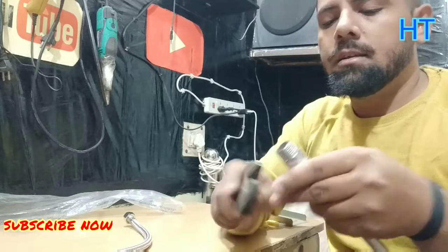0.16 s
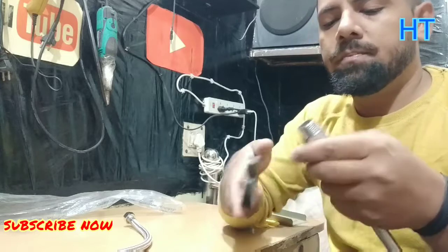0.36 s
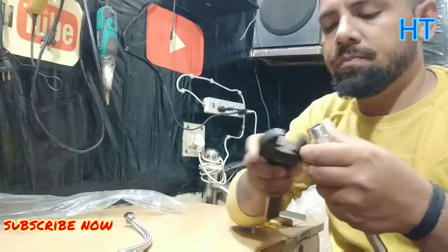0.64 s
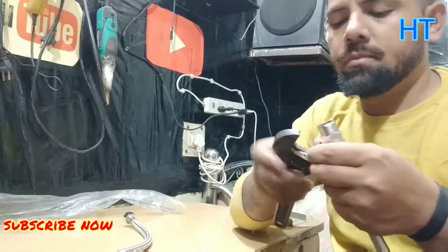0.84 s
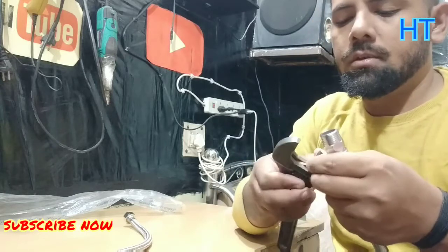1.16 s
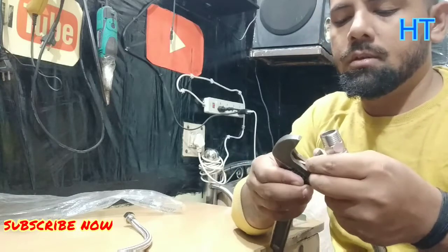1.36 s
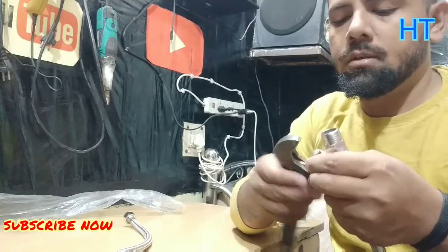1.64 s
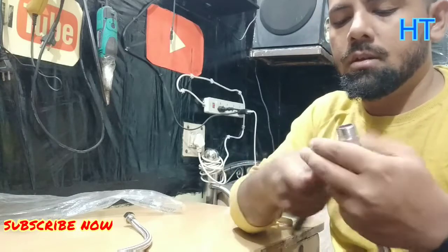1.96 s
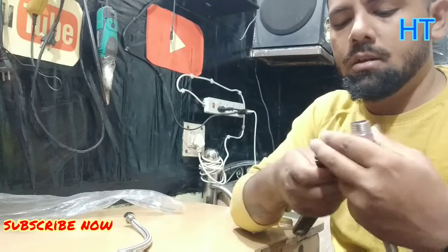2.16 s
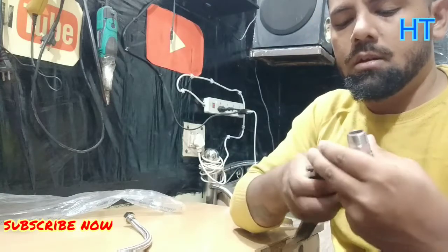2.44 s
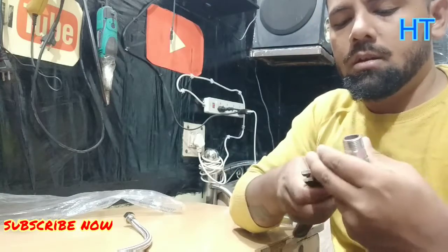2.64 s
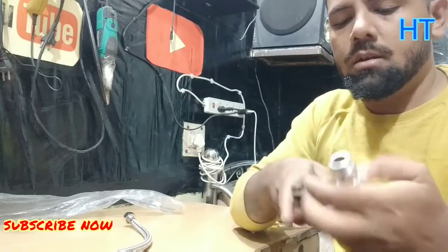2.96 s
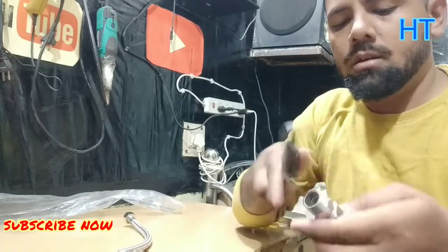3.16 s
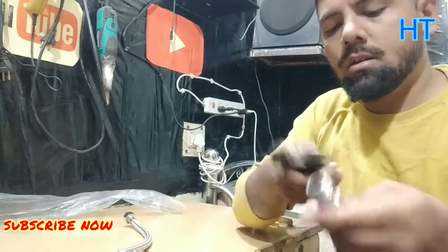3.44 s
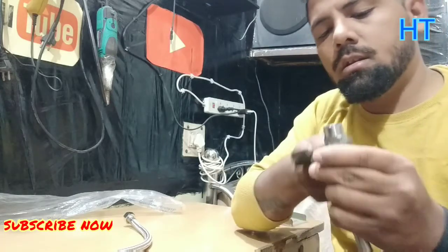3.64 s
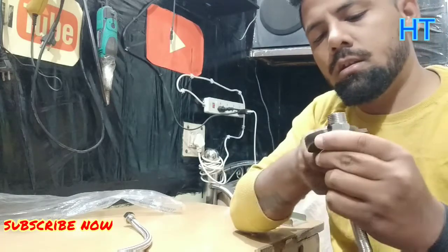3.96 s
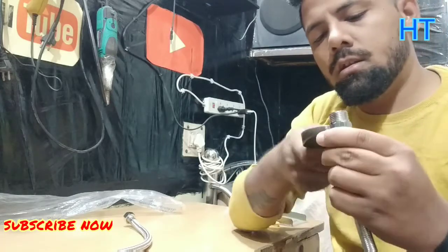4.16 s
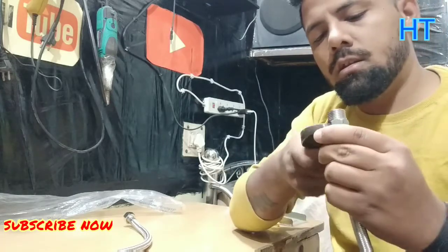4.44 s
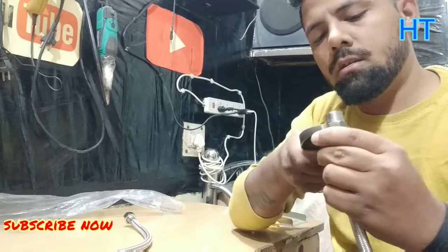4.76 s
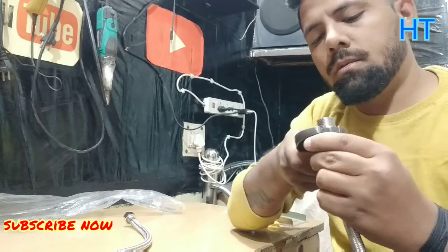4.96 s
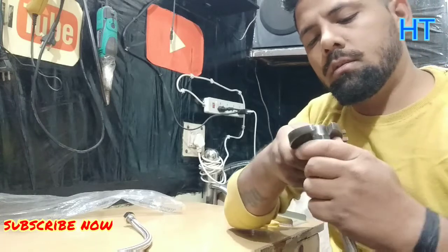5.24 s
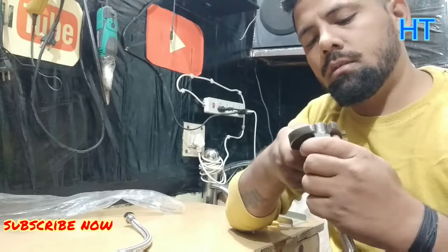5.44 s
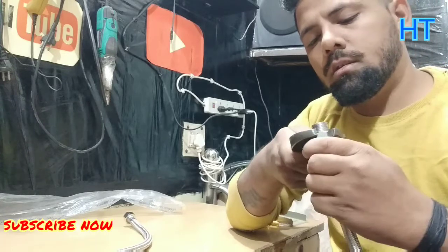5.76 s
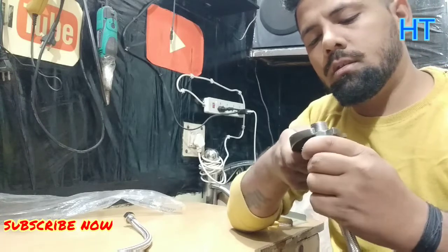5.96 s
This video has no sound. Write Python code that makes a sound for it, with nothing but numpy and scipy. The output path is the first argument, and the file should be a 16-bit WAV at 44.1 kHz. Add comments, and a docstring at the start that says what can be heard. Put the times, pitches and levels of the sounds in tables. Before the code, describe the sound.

A steel wrench is fitted to a hand-held metal pipe connector at a workbench. A few light, ringing clinks come first, then small clicks and scrapes as the jaws settle. Midway the jaws catch with a loud metallic crack, slip with soft crunches and rubbing, and crack again near the end. The handling sounds close in a small, live room, over faint rumble, hiss and a wavering low hum.

```python
"""Wrench on a pipe connector.

A steel wrench is fitted to a hand-held metal connector at a workbench in a small, live room.
Loose knocks rebound and leave the wrench ringing; held against the fitting, its jaws click, skid
and twice bite hard. Tiny catches of the rough steel drive the modes of both parts.
Under it lie room rumble, faint hiss and a wavering low hum."""
import sys
import numpy as np
from scipy import signal
from scipy.fft import rfft, irfft, next_fast_len
from scipy.io import wavfile

SR = 44100
rng = np.random.default_rng(int(sys.argv[2]) if len(sys.argv) > 2 else 0)


def master_out(mix):
    """Clip the mix to full scale and print it as 16-bit PCM to the path in sys.argv[1]."""
    frames = np.transpose(np.atleast_2d(mix))
    ceiling = np.clip(frames, -1, 1)
    pcm = np.round(ceiling * 32767).astype(np.int16)
    wavfile.write(sys.argv[1], SR, pcm)


N = 268657

# loose knocks: (time [s], level [dB], skid [s], edge [dB], pan L-R [dB], spot [Hz], second spot [Hz],
# rebound delay [s], rebound level [dB], rebound spot [Hz])
KNOCKS = [(0.7993, -31, 0.0035, 0.5, 1.5, 7440, 8780, 0.0069, -38.5, 7500),
          (1.039, -24, 0.0044, 5, 3, 6200, 2278, .018, -31, 4560),
          (1.169, -31.5, 0.0058, 1, 3, 3080, 10970, 0.013, -28, 6866),
          (3.092, -28, 0.0038, -4.5, -7, 7210, 3400, 0.088, -44.5, 2900),
          (3.678, -28, 0.0056, 7.5, -3.5, 4850, 5330, 0.02, -37, 4690),
          (3.9036, -28, 0.0046, -0.5, -13, 7060, 3000, 0.023, -44.5, 6850)]
def clinks():
    """A half-choked knock, then a rebound that leaves the wrench ringing freely; stereo."""
    out = np.zeros((2, N))
    for s, db, skid_s, edge_db, pan_db, spot_hz, second_hz, delay_s, rebound_db, rebound_hz in KNOCKS:
        pan = from_db([[pan_db / 2], [-pan_db / 2]])
        t60_s = 3.3 * skid_s   # a looser, longer graze rings longer
        knock = contact(db, skid_s, t60_s, catch=0.58, grip_db=-17, snap_db=0, body_db=3.5,
                        edge_db=edge_db, spot_hz=[spot_hz, second_hz], lift_db=10)
        rebound = contact(rebound_db, skid_s=0.0095, t60_s=0.023, catch=0.67, grip_db=-11.5,
                          snap_db=-1.5, body_db=6.5, edge_db=edge_db, spot_hz=rebound_hz, lift_db=16.5)
        add(out, s, pan * knock)
        add(out, s + delay_s, pan * rebound)
    return out


# hard catches: (time [s], level [dB], skid [s], snap [dB], body [dB], edge [dB], spot [Hz], lift [dB],
# room send [dB])
JAW_BITES = [(3.6253, -18, 0.004, 12, 2.5, 17, 5400, 17.5, -3.5),
             (3.628, -14.5, 0.0066, 1, 0.5, -0.5, 9250, 13.5, -5),
             (5.6835, -37, 0.007, 15, -1, -29, 4160, 7, 9.5),
             (5.695, -28.5, 0.0061, -0.5, -1.5, -9, 2770, 20, 4.5),
             (5.699, -20.5, 0.00033, 34, -10.5, -7, 4050, 14, -3),
             (5.7027, -28, 0.0063, 7.5, -7, -2, 8800, 21, 3.5)]
def bites():
    """The jaws catch hard in quick runs of loud metallic cracks; returns direct sound and room send."""
    out = np.zeros((2, N))
    for s, db, skid_s, snap_db, body_db, edge_db, spot_hz, lift_db, send_db in JAW_BITES:
        bite = contact(db, skid_s, t60_s=0.012, catch=0.51, grip_db=-3, snap_db=snap_db,
                       body_db=body_db, edge_db=edge_db, spot_hz=spot_hz, lift_db=lift_db)
        add(out, s, bite * from_db([[0], [send_db]]))
    return out


# jaws seating: (time [s], level [dB], skid [s], edge [dB], spot [Hz], lift [dB])
JAW_CLICKS = [(0.0188, -30.5, 0.0023, 0.5, 4800, 8), (1.398, -44, 0.01, 3, 4000, 15),
              (2.166, -49, 0.0028, 15, 6220, 26.5), (2.3275, -35.5, 0.0018, -6, 4730, 17),
              (2.3673, -31, 0.0036, 9, 9230, 11), (2.3744, -32, 0.0025, -20, 4780, 14),
              (2.61, -42, 0.017, -1, 6080, 17), (2.78, -45, 0.0021, 2, 4800, 12),
              (2.819, -38.5, 0.0022, 3, 6560, 8), (2.931, -42.5, 0.011, 6, 5200, -15),
              (3.655, -33, 0.004, -1, 9560, 14.5), (3.845, -45, 0.0066, 2, 4530, 25),
              (4.2238, -42.5, 0.008, -9, 9250, 25.5), (4.3645, -53.5, 0.001, 0, 4680, 24),
              (5.3365, -40, 0.004, 6, 9250, 11)]
def clicks():
    """The jaws click into place against the fitting."""
    out = np.zeros(N)
    for s, db, skid_s, edge_db, spot_hz, lift_db in JAW_CLICKS:
        body_db = 0.93 * (-41.5 - db)   # harder clicks have less body
        click = contact(db, skid_s, t60_s=0.017, catch=0.42, grip_db=2.5, snap_db=22,
                        body_db=body_db, edge_db=edge_db, spot_hz=spot_hz, lift_db=lift_db)
        add(out, s, click)
    return out


# jaws slipping: (time [s], level [dB], skid [s], edge [dB], spot [Hz], lift [dB])
JAW_SKIDS = [(2.187, -46.5, 0.028, 3, 3100, 27), (2.656, -45, 0.014, -15, 3080, 10),
             (2.723, -52, 0.042, -1, 3020, 14), (4.3683, -33.5, 0.0091, -27.5, 2000, 16.5),
             (4.377, -39.5, 0.0065, -17, 4530, 3), (4.396, -37.5, 0.0088, -9, 1990, 14),
             (5.064, -37, 0.0026, -23, 3150, 14.5), (5.069, -39, 0.0054, -3.5, 3130, 20),
             (5.1101, -41, 0.0058, -3, 5280, 14), (5.169, -44, 0.0045, 1, 6100, 15),
             (5.2392, -46.5, 0.0087, -2, 4630, 6), (5.267, -43.5, 0.0044, -8, 6100, 16),
             (5.275, -49.5, 0.0053, -8, 4530, 17), (5.555, -53, 0.018, -12.5, 3830, 9)]
def skids():
    """Longer, duller crunches as the jaws slip round the fitting."""
    out = np.zeros(N)
    for s, db, skid_s, edge_db, spot_hz, lift_db in JAW_SKIDS:
        crunch = contact(db, skid_s, t60_s=0.043, catch=0.72, grip_db=7, snap_db=22.5,
                         body_db=3, edge_db=edge_db, spot_hz=spot_hz, lift_db=lift_db)
        add(out, s, crunch)
    return out


# slides: (centre time [s], half length [s], level [dB], edge [dB])
SLIDES = [(0.729, 0.25, -61.5, 6), (1.837, 0.086, -60.5, 10), (2.803, 0.042, -49, 5),
          (3.053, 0.018, -47.5, 10), (3.623, 0.009, -29, 1), (4.887, 0.039, -51.5, 1),
          (4.363, 0.005, -40.5, -1.5), (5.219, 0.36, -53.5, -12), (5.657, 0.0069, -46.5, -14)]
def rubs():
    """Steel slides on steel or skin: catches swell and fade, driving damped modes."""
    out = np.zeros(N)
    t = np.arange(-SR // 6, SR // 6) / SR
    for s, half_s, db, edge_db in SLIDES:
        force = asperities(len(t), per_s=200, spread_db=2) * np.exp(-(t / half_s) ** 2)
        rub = steel(force, t60_s=0.046, grip_db=0, snap_db=13.5, body_db=-0.5, edge_db=edge_db)
        add(out, s + t[0], from_db(db) * np.sqrt(half_s * SR / 2) * rub)
    return out


def contact(db, skid_s, t60_s, catch, **timbre):
    """One sharp catch, then a short, dying skid, drives the steel."""
    t = np.arange(SR // 8) / SR
    force = unit_energy(asperities(len(t), per_s=3300, spread_db=11) * np.exp(-2 * t / skid_s))
    force[0] += catch
    gain = from_db(db) * np.sqrt(0.0096 * SR)   # level as if the energy fell within 9.6 ms
    return gain * steel(force, t60_s, **timbre)


def asperities(count, per_s, spread_db):
    """Tiny catches of rough surfaces, random in time and size."""
    hits = rng.random(count) < per_s / SR
    signs = rng.choice([-1, 1], count)
    return hits * signs * from_db(spread_db * rng.standard_normal(count))


# free wrench: (frequency [Hz], level [dB], t60 [x contact t60])
WRENCH_MODES = [(747, -15, 1), (1830, -10.5, .9), (2323, -12.5, 1), (3025, -19, 1.3), (3207, -8.5, 1.3),
                (3700, -26, .8), (4599, 1.5, .95), (4714, -7.5, .9), (5136, -4.5, 1.2), (6160, 3, 1.1),
                (7047, 7.5, 1.3), (7088, -10.5, 1), (7680, -1.5, .9), (8410, -1, 1), (9310, 0.5, 1),
                (9380, -6, .9), (9700, -0.5, 1), (10990, -3, 1.1), (11740, -8.5, .9), (12590, 0.5, 1),
                (12300, -15, 1)]
# fitting with the jaws pressed on it: (frequency [Hz], level [dB], t60 [x contact t60])
FITTING_MODES = [(1479, 1, .8), (1973, 3.5, 1), (2623, -14, .7), (2915, 1, 1.2), (3040, 0, 1.2),
                 (3663, -14, .6), (3958, -6.5, .8), (4127, -1.5, .7), (4396, 1, .8), (4664, -4.5, .7),
                 (4770, -6.5, .8), (5310, -5, .8), (6310, -5.5, .7), (7320, -2.5, .7), (7530, -0.5, .6),
                 (8590, 2, 1), (9200, 2, 1), (9610, -4, .8), (12610, -11.5, .6)]
def steel(force, t60_s, grip_db, snap_db, body_db, edge_db, spot_hz=0, lift_db=0):
    """The wrench rings; grip_db mixes in the fitting's ring, snap_db a sharp snap."""
    wrench = struck(force, WRENCH_MODES, t60_s, spot_hz, lift_db, detune=0.0015)
    fitting = struck(force, FITTING_MODES, t60_s, spot_hz, lift_db, detune=0.005)
    mix = wrench + from_db(grip_db) * fitting + from_db(snap_db) * pipe_snap(force)
    # the spot hit tilts the spectrum: body is the lower range, edge the top
    tilt = [(3200, body_db), (4400, 1.34), (7600, 3.1), (9000, edge_db), (12000, 0.21 * edge_db)]
    return unit_energy(colour(mix, tilt))


def struck(force, modes, t60_s, spot_hz, lift_db, detune, spot_width_hz=260, choked_db=-22):
    """Modes build up, sound choked while the metals touch, and ring on; the spot hit lifts near ones."""
    out = 0
    for (hz, db, t60_ratio), shift in zip(modes, rng.standard_normal(len(modes))):
        held_hz = hz * (1 + detune * shift)   # the hold shifts each mode
        buildup = ring(force, held_hz, t60_s=0.012)
        free = unit_energy(ring(buildup, held_hz, t60_s * t60_ratio))
        choked = unit_energy(ring(buildup, held_hz, t60_s=0.0075))
        nearness = np.max(np.exp(-((hz - np.asarray(spot_hz)) / spot_width_hz) ** 2))
        out = out + from_db(db + lift_db * nearness) * (free + from_db(choked_db) * choked)
    return out


def ring(force, hz, t60_s):
    """One decaying mode driven by a force."""
    radius = from_db(-60 / (t60_s * SR))
    angle = 2 * np.pi * hz / SR
    drive = force + 1e-18 * np.arange(len(force))   # avoids denormals
    return signal.lfilter([1, 0, -1], [1, -2 * radius * np.cos(angle), radius * radius], drive)


# bare snap of gripping jaws: (frequency [Hz], gain [dB])
SNAP_SPECTRUM = [(100, -15), (350, -7.5), (700, -8), (1100, 0.5), (1600, -6.5), (2300, 7), (3300, 5.5),
                 (4700, 0), (7500, -2.5), (9400, 0), (10300, -5), (12600, -24.5), (14000, -12.5)]
def pipe_snap(force, round_trip_hz=771, return_gain=0.42):
    """A snap runs back and forth along the pipe, leaving evenly spaced resonances."""
    snap = colour(force, SNAP_SPECTRUM)
    hz = np.fft.rfftfreq(len(snap), 1 / SR)
    round_trip = return_gain * np.exp(-2j * np.pi * hz / round_trip_hz)
    return unit_energy(irfft(rfft(snap) / (1 - round_trip), len(snap)))


# left-channel delay, growing as the hands swing aside: (time [s], lag [s])
LEFT_DELAY = [(2.9, 0.00014), (3.5, 0.00021), (4.3, 0.000215), (5.0, 0.00018)]
def in_room(dry, send, wet_db=0.5, pan_db=2):
    """The direct sound arrives later on the left; each side has its own reflections."""
    n = np.arange(N)
    left = np.interp(n - in_time(LEFT_DELAY) * SR, n, dry[0])
    direct = np.array([left, dry[1]])
    wet = np.array([signal.fftconvolve(send, room_response())[:N] for _ in direct])
    return (direct + from_db(wet_db) * wet) * from_db([[pan_db / 2], [-pan_db / 2]])


# room decay: (frequency [Hz], t60 [s])
ROOM_DECAY = [(300, 0.27), (2000, 0.27), (5000, 0.3), (9000, 0.24), (13000, 0.17)]
def room_response(onset_s=0.00057, dense_s=0.036):
    """Sparse early reflections thicken into a tail whose top dies first."""
    t = np.arange(SR // 2) / SR
    density = np.clip((t / dense_s) ** 2, 0.03, 1)
    echoes = rng.standard_normal(len(t)) * (rng.random(len(t)) < density) / np.sqrt(density)
    edges_hz = [100, 1500, 3500, 6000, 9000, 15000]
    tail = 0
    for low, high in zip(edges_hz, edges_hz[1:]):
        band = signal.sosfilt(signal.butter(3, [low, high], "band", fs=SR, output="sos"), echoes)
        t60_s = at_hz(ROOM_DECAY, np.sqrt(low * high))
        tail = tail + band * from_db(-60 * t / t60_s)
    return unit_energy(tail * (1 - np.exp(-t / onset_s)))


# room air: (frequency [Hz], relative density [dB])
AIR_SPECTRUM = [(15, 6), (24, -1), (34, -16), (50, 3), (60, -3), (85, -3), (150, -8.5), (300, -13.5),
                (550, -13.5), (800, -17.5), (1300, -24.5), (2000, -26.5), (3200, -33), (5000, -36),
                (13000, -40.5)]
# stereo width: (frequency [Hz], side over mid [dB])
AIR_SIDE = [(30, -10), (120, -14), (250, -8.5), (500, -6), (1000, 3.5), (2500, 0), (12000, -0.5)]
# air envelope: (time [s], relative level [dB])
AIR_ENVELOPE = [(0.0, -52.5), (0.83, -54), (4.95, -56), (6.09, -56)]
def air(gain_db):
    """Rumble common to both sides, hiss that differs between them."""
    mid, side = (colour(noise, AIR_SPECTRUM) for noise in rng.standard_normal((2, N)))
    side = colour(side, AIR_SIDE)
    stereo = (mid + side * [[1], [-1]]) / mid.std()
    return from_db(in_time(AIR_ENVELOPE) + gain_db) * stereo


# hum envelope: (time [s], relative level [dB])
HUM_ENVELOPE = [(0, -41), (0.16, -43), (0.3, -57), (1.14, -55.5), (1.28, -43.5), (1.56, -42.5),
                (1.86, -51.5), (3.33, -51), (3.55, -56), (4.78, -55), (4.92, -46.5), (5.06, -57.5),
                (6.09, -54)]
def hum(gain_db, pitch_hz=120.8, wander_hz=1.83, flutter_db=2):
    """A low tone that wavers in pitch and strength."""
    phase = 2 * np.pi * np.cumsum(pitch_hz + wander_hz * drift(rate_hz=5.2)) / SR
    level_db = in_time(HUM_ENVELOPE) + gain_db + flutter_db * drift(rate_hz=6.1)
    return np.sqrt(2) * from_db(level_db) * np.sin(phase)


def drift(rate_hz):
    """Smooth random curve with unit spread."""
    knots = rng.standard_normal(int(N / SR * 40) + 200)
    slow = signal.sosfilt(signal.butter(2, rate_hz, fs=40, output="sos"), knots)[199:]
    return np.interp(np.linspace(0, 1, N), np.linspace(0, 1, len(slow)), slow / slow.std())


def colour(x, points):
    """Minimum-phase filter following (frequency [Hz], gain [dB]) points."""
    size = next_fast_len(len(x) + 2048, True) * 2
    gain = from_db(at_hz(points, np.fft.rfftfreq(size, 1 / SR)))
    cepstrum = irfft(np.log(gain))
    cepstrum[1:size // 2] *= 2   # fold onto the causal half
    cepstrum[size // 2 + 1:] = 0
    return irfft(rfft(x, size) * np.exp(rfft(cepstrum)))[:len(x)]


def from_db(db):
    """Decibels to gain."""
    return 10 ** (np.asarray(db) / 20)


def unit_energy(x):
    """Scale so the squares sum to one."""
    return x / np.sqrt(np.sum(x ** 2) + 1e-20)


def at_hz(points, hz):
    """Read a table on a log-frequency axis."""
    knots_hz, values = np.transpose(points)
    return np.interp(np.log(np.maximum(hz, 1)), np.log(knots_hz), values)


def in_time(rows):
    """Join (time [s], value) rows by straight lines."""
    return np.interp(np.arange(N) / SR, *np.transpose(rows))


def add(track, s, sound):
    """Mix a sound into a track at a time."""
    start = max(round(s * SR), 0)
    track[..., start:start + sound.shape[-1]] += sound[..., :max(N - start, 0)]


def scene():
    """The metalwork in its room, over air and hum."""
    metal = clinks() + skids() + rubs()
    clicking = clicks()
    biting, bite_send = bites()
    click_send = from_db(-4.5) * clicking   # clicks face the listener and stir the room less
    work = in_room(metal + clicking + biting, send=metal.mean(axis=0) + click_send + bite_send)
    return work + air(gain_db=6.5) + hum(gain_db=-5.5)


def record(dry):
    """Soft clip, then a steep low-pass."""
    cutoff_hz = 13300
    lowpass = signal.ellip(10, 0.1, 80, cutoff_hz, fs=SR, output="sos")
    return signal.sosfilt(lowpass, np.tanh(dry))


dry = scene()
out = record(dry)
master_out(out)
```